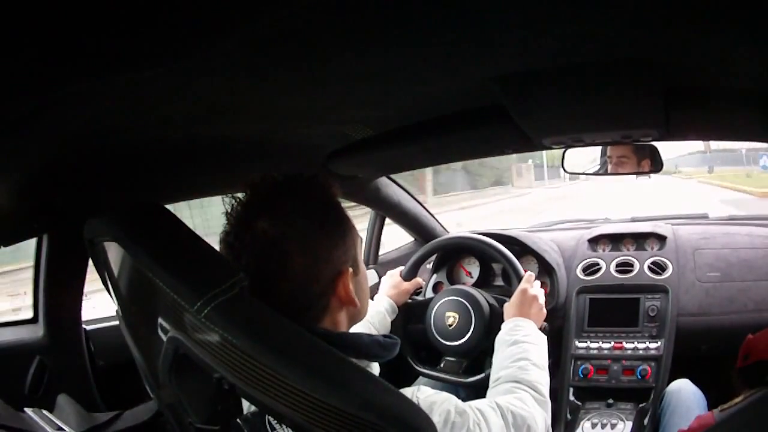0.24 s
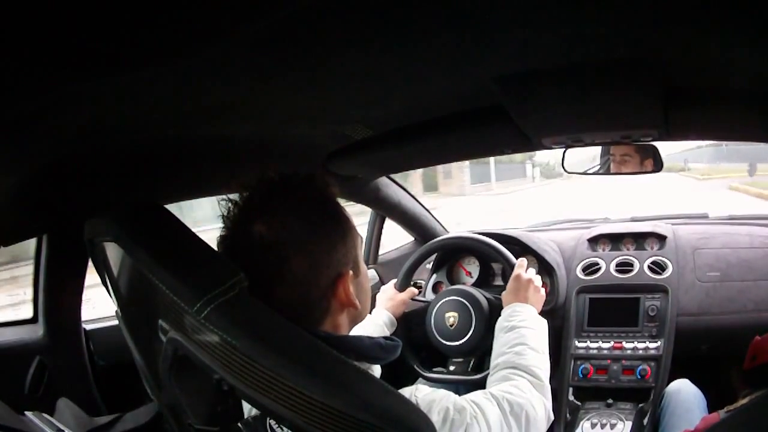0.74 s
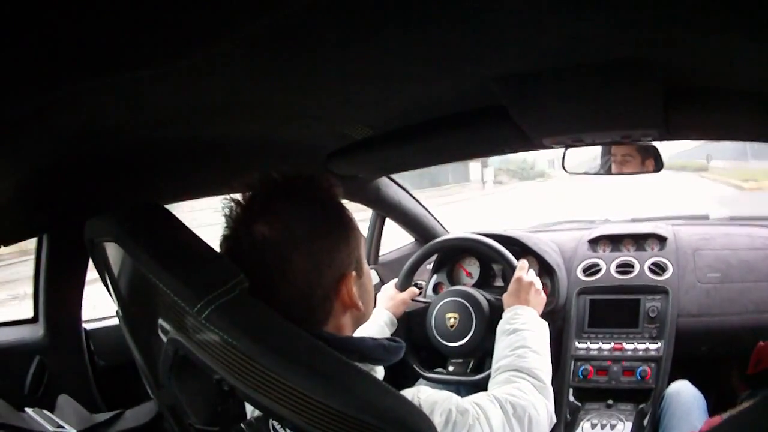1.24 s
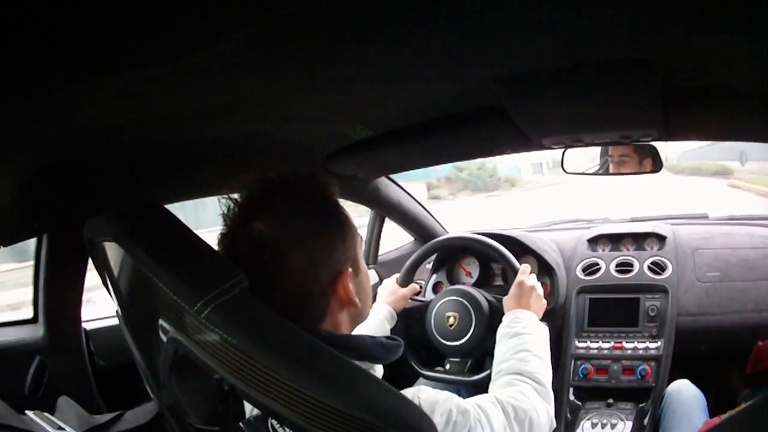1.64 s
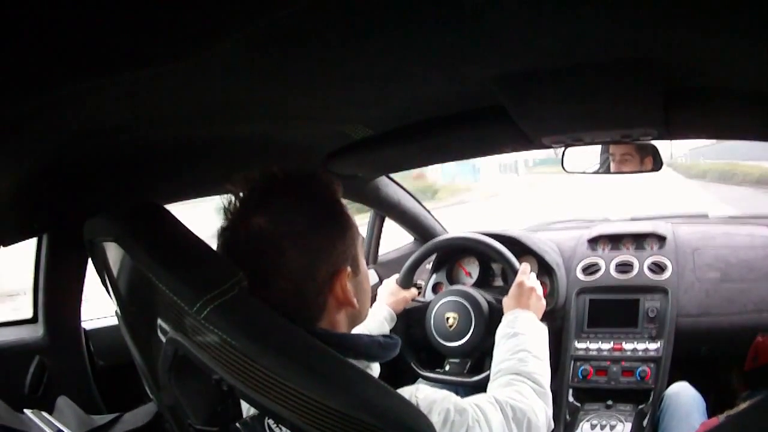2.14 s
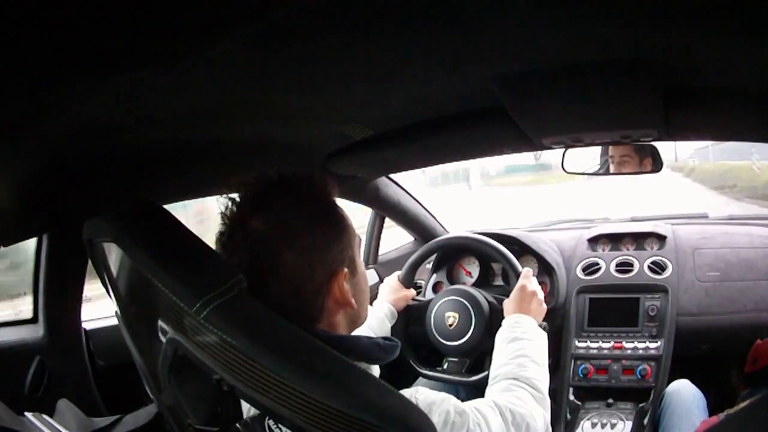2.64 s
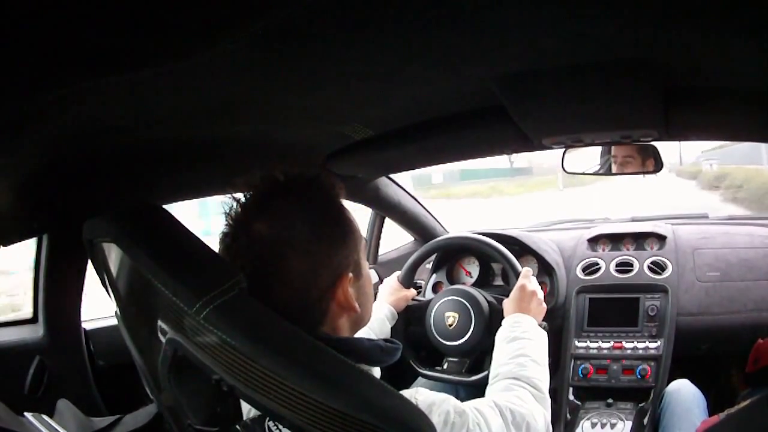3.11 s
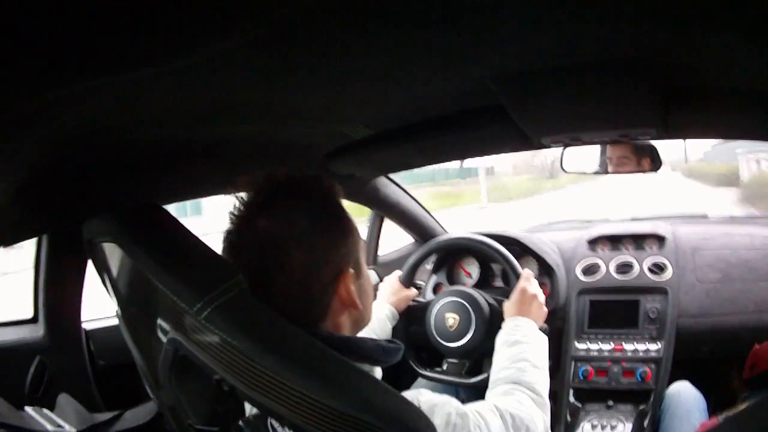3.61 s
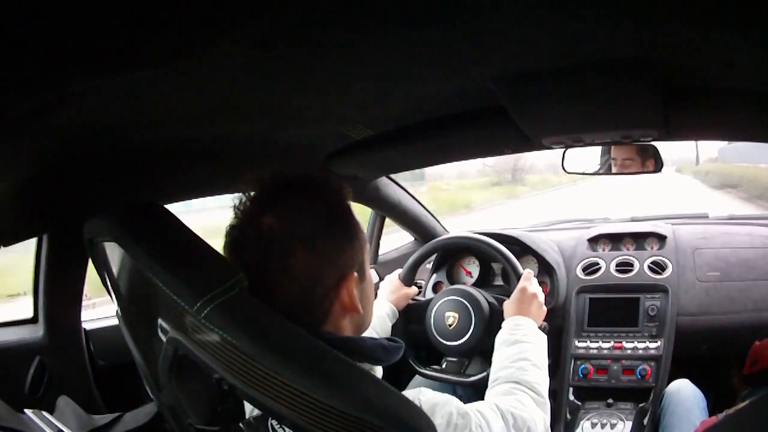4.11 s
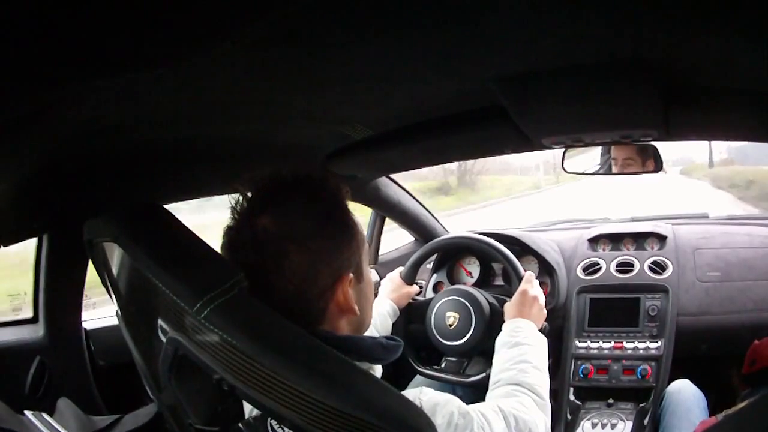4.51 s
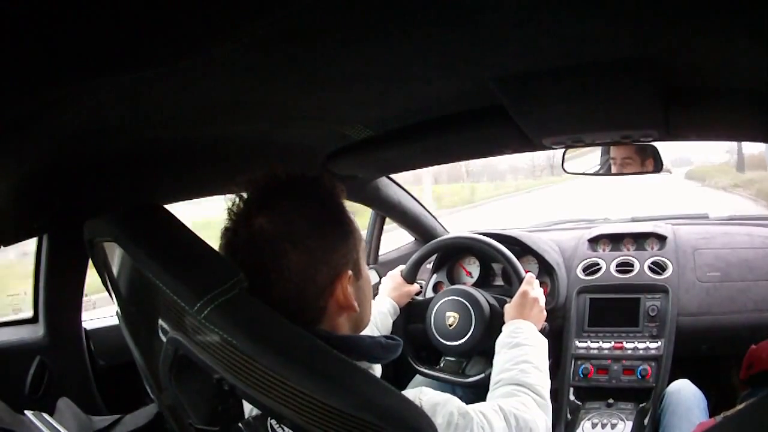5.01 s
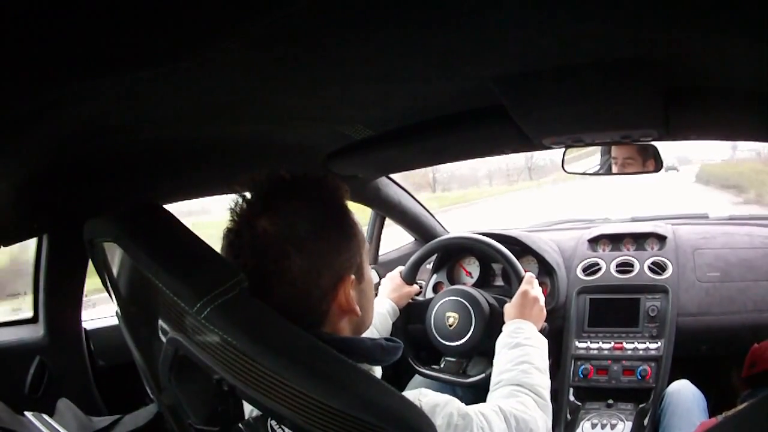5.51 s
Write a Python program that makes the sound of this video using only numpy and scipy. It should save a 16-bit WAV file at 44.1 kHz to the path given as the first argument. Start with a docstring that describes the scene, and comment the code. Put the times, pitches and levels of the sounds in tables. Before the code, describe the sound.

Inside a sports car, a steady ten-cylinder engine drone swells with the throttle over tyre roar, while rough road brings heavy low thuds and faint rattles.

```python
"""An engine drone is heard first, swelling on the throttle inside a ten-cylinder sports car on an open road.
Engine orders are sines locked to the crank; tyre roar, body boom and hiss are shaped noise.
Rough stretches bring noise shaking, deep decaying thuds, faint dry ticks and a few ringing trim knocks.
A thin steady whine lies underneath. One microphone behind the seats; distance is not modelled,
so each source is set directly at its level there."""
import sys
import numpy as np
from scipy import signal
from scipy.fft import rfft, irfft, next_fast_len
from scipy.io import wavfile
from scipy.ndimage import uniform_filter1d

SR = 44100
rng = np.random.default_rng(int(sys.argv[2]) if len(sys.argv) > 2 else 0)


def persist_wave(psi):
    """Save psi, clipped to +-1, as 16-bit WAV."""
    counts = np.round(np.clip(psi, -1, 1) * 32767).astype(np.int16)
    wavfile.write(sys.argv[1], SR, np.atleast_2d(counts).T)


N = 253575
TIME = np.arange(N) / SR  # s

# Engine speed, ten firings per four-stroke cycle: t/s, cycle rate f/Hz
ENGINE_SPEED = [(0, 26.92), (.3, 26.91), (.7, 26.69), (2.1, 26.31), (2.9, 26.75), (3.5, 27.2), (4.3, 26.96),
                (5.3, 26.85), (5.75, 26.66)]
# Engine orders in the cabin: multiple of the cycle rate, base coasting level/dB, full-throttle level/dB
ENGINE_ORDERS = [(5, -45, -37), (7, -54, -47), (8, -50, -39), (9, -54, -46), (10, -44, -31), (11, -49, -37),
                 (12, -48, -40), (13, -49, -43), (14, -50, -39), (16, -56, -49), (17, -64, -54),
                 (20, -60, -56), (21, -55, -56), (22, -58, -57), (23, -60, -57), (24, -54, -48),
                 (25, -53, -51), (26, -62, -59), (28, -65, -56), (30, -67, -60), (31, -72, -63),
                 (44, -78, -76), (50, -70, -72), (64, -77, -75)]
# Presses of the accelerator: start t/s, length t/s, depth (0-1)
PRESSES = [(-.5, 0.66, 1), (1.807, 1.05, 0.3), (2.713, .85, 1.0)]
PRESS_S, LIFT_S = 0.39, 0.081  # straight rise, decay time constant
# Exhaust resonance that the drone of order 15 passes through: centre and half width
PIPE_HZ, PIPE_WIDTH_HZ = 398, 7

# Spectrum of the tyre roar: f/Hz, relative level/dB per Hz
ROAR_SPECTRUM = [(60, -1), (115, 3.5), (160, -0.5), (240, 0), (340, 3), (430, -4.5), (500, -13), (570, -9),
                 (760, -8.5), (880, -17), (1080, -25), (1400, -28), (1820, -31.5), (2100, -44),
                 (3000, -51.5)]
# Narrow body resonances stirred by the tyres: f/Hz, width f/Hz, level/dB
PANELS = [(420.6, 42, -49), (666, 85, -56.5), (1725, 17, -73)]
# Rough stretches, from jolts to coarse asphalt:
# start t/s, length t/s, body shaking level/dB, slow cabin air heave level/dB, cabin boom level/dB
PATCHES = [(-.06, 0.085, -13, -11, -15), (1.281, 0.26, -12.5, -9.5, -24.5), (1.777, 0.18, -31, -7, -39.5),
           (1.968, .18, -15, -13, -25), (2.18, 0.26, -12.5, -10, -29), (3.586, .24, -10, -12, -24),
           (4.477, 0.087, -38, -37, -21.5), (4.689, 0.286, -21, -22, -20.5), (4.977, 0.26, -21, -18, -27),
           (5.3, 0.14, -23, -7.5, -53)]
SHAKE, HEAVE, BOOM = 2, 3, 4  # columns of PATCHES
PATCH_ATTACK_S, PATCH_RELEASE_S = 0.05, 0.07
# The same three levels on smooth road
SMOOTH_SHAKE_DB, SMOOTH_HEAVE_DB, SMOOTH_BOOM_DB = -24.5, -20, -32.5

# Spectrum of the body's shaking: f/Hz, relative level/dB per Hz
THUD_SPECTRUM = [(10, 0), (25, 10), (45, -2), (74, 0), (95, -16), (120, -20.5), (165, -18), (250, -26.5),
                 (500, -31), (1000, -53), (2000, -92)]
# Spectrum of the slow heave of the cabin air: f/Hz, relative level/dB per Hz
HEAVE_SPECTRUM = [(1, -31), (2, -18.5), (6, 10.5), (9, 1.5), (14, -26.5), (25, -6.5), (60, -46),
                  (200, -110)]
# Spectrum of the rustling interior: f/Hz, relative level/dB per Hz
RUSTLE_SPECTRUM = [(300, 1), (1000, 5), (1500, -2.5), (2200, -10.5), (4000, -15), (6000, -18.5),
                   (15000, -31)]

# Steady electronic whine: f/Hz, level/dB
WHINE = [(3898, -88), (6475, -81), (6525, -74), (9100, -77), (9150, -83), (11725, -90)]
# Spectrum of the electronic hiss: f/Hz, relative level/dB per Hz
HISS_SPECTRUM = [(100, -27), (2000, 2), (2700, 3.5), (3150, 4.5), (3600, 3), (5000, 2), (8000, 3),
                 (15000, 4.5)]

# Wheels striking edges in the road: t/s, level/dB, pitch of the body's answer f/Hz
THUMPS = [(0.022, -3, 62.4), (1.296, -8, 83.5), (1.356, -7, 62.3), (1.393, 0, 54.7), (1.436, -4, 68.8),
          (2.084, -8.5, 64.7), (2.207, -1.5, 56.4), (2.252, -2.5, 68.8), (3.633, 0, 67.4),
          (3.694, -1, 80.8), (3.762, -0.5, 52.3)]
# Clearest dry ticks: t/s, relative level/dB, ticks in the run
TICKS = [(1.3665, -33, 1), (1.4015, -38, 1), (1.460, -39, 1), (1.477, -34, 1), (1.5035, -39, 1),
         (1.513, -35, 2), (1.586, -38, 1), (1.906, -38, 1), (1.9865, -39, 1), (2.218, -39, 1),
         (2.377, -33, 2), (2.443, -35, 3), (3.688, -36, 2), (3.7425, -36, 1), (3.8325, -39, 1),
         (3.850, -38, 1), (5.370, -38, 1), (5.4405, -34, 1)]
# Within a run each tick follows quickly and is weaker than the last
TICK_GAP_S, TICK_FALL_DB = 0.0055, 1.5

# Small knocks of the trim: t/s, relative level/dB
KNOCKS = [(1.3818, -31), (1.384, -26), (2.0583, -27), (3.719, -39)]
# Modes of the ringing trim: f/Hz, relative level/dB, 60 dB decay t/s
TRIM_MODES = [(373, 6, 0.025), (550, -20, 0.035), (900, 2, 0.004), (1410, -0.5, 0.0087), (1764, -9, 0.024),
              (2500, -21, 0.0071), (3100, -5.5, 0.0081), (5630, -8.5, 0.0031)]
EDGE_HZ = 15300  # upper band edge


def gain_of(db):
    """Decibels to amplitude."""
    return 10 ** (np.asarray(db) / 20)


def evened(x):
    """Scales to rms 1."""
    return x / np.sqrt(np.mean(x ** 2) + 1e-20)


def curve(rows):
    """A time table interpolated at every sample."""
    return np.interp(TIME, *np.transpose(rows))


def add(mix, s, sound):
    """Mixes a sound in at time s, cut at the end of the mix."""
    part = mix[round(s * SR):][:len(sound)]
    part += sound[:len(part)]


def noise(shape):
    """Noise of rms 1 whose amplitude spectrum is shape(Hz)."""
    size = next_fast_len(N)
    hz = np.fft.rfftfreq(size, 1 / SR)
    spectrum = rfft(rng.standard_normal(size)) * shape(hz)
    return evened(irfft(spectrum, size)[:N])


def coloured(points):
    """Noise of rms 1 following a table of f/Hz and relative level/dB."""
    hz, db = np.transpose(points)
    return noise(lambda f: gain_of(np.interp(np.log(f + 1), np.log(hz + 1), db)))


def ringing(hz, width):
    """Noise of rms 1 in one steep-sided resonance."""
    return noise(lambda f: 1 / (1 + 0.5 * ((f - hz) / width) ** 2) ** 2)


def steadied(x, seconds):
    """Evens out the slow swells of a noise, so that its level can be steered."""
    size = max(int(seconds * SR), 2)
    power = uniform_filter1d(uniform_filter1d(x ** 2, size), size)
    return x / np.sqrt(abs(power) + 1e-9)


def drift(rate_hz):
    """Slow smooth random wander of rms 1."""
    steps = np.linspace(0, TIME[-1], 2048)
    hz = np.fft.rfftfreq(len(steps), steps[1])
    slow = irfft(rfft(rng.standard_normal(len(steps))) / (1 + (hz / rate_hz) ** 2))
    return np.interp(TIME, steps, evened(slow))


def swell(start, length, attack_s, release_s):
    """Rises in a straight line, holds until its length is over, then dies away."""
    held = np.clip((np.minimum(TIME, start + length) - start) / attack_s, 0, 1)
    return held * np.exp(-np.maximum(TIME - start - length, 0) / release_s)


def pedal():
    """Throttle opening, 0-1: pressed slowly, lifted quickly."""
    presses = [depth * swell(s, length, PRESS_S, LIFT_S) for s, length, depth in PRESSES]
    return np.max(presses, axis=0)


def road(smooth_db, column):
    """Strength of one vibration along the road: smooth surface and rough patches add in power."""
    power = gain_of(smooth_db) ** 2
    for row in PATCHES:
        patch = gain_of(row[column]) * swell(row[0], row[1], PATCH_ATTACK_S, PATCH_RELEASE_S)
        power = power + patch ** 2
    return np.sqrt(power)


def shaking():
    """How hard the road shakes the body."""
    return road(SMOOTH_SHAKE_DB, SHAKE)


def engine(waver_db=1.5, coasting_db=-0.16, drone_db=-43, drone_pull_db=9.0):
    """Firing gives order 10, each bank's beat 5 and 15; unequal cylinders fill in the orders between."""
    phase_wander = 0.001 * drift(rate_hz=4)  # cycles
    speed, throttle = curve(ENGINE_SPEED), pedal()
    turns = np.cumsum(speed) / SR + phase_wander  # four-stroke cycles
    # the square root lets order 15 drone in the exhaust even under light throttle
    in_tune = 1 / (1 + ((15 * speed - PIPE_HZ) / PIPE_WIDTH_HZ) ** 2)
    drone_level_db = drone_db + drone_pull_db * np.sqrt(throttle) * in_tune
    out = gain_of(drone_level_db) * np.sin(2 * np.pi * 15 * turns)
    for order, coast_db, pull_db in ENGINE_ORDERS:
        level_db = (1 - throttle) * (coast_db + coasting_db) + throttle * pull_db
        level_db = level_db + waver_db * drift(rate_hz=1.9)
        out += gain_of(level_db) * np.sin(2 * np.pi * (order * turns + rng.random()))
    return np.sqrt(2) * out  # the levels are rms


def tyres(roar_db=-34.0, pull_db=0.9, cavity_db=-13):
    """Tyre roar rises a little with throttle; coarse road stirs the cabin boom and hollow tyre note."""
    roar = gain_of(roar_db + pull_db * pedal()) * coloured(ROAR_SPECTRUM)
    panels = sum(gain_of(db) * ringing(hz, width) for hz, width, db in PANELS)
    boom = steadied(ringing(hz=91.2, width=11.0), seconds=0.19)
    cavity = steadied(ringing(hz=199, width=6), seconds=0.2)
    return roar + panels + road(SMOOTH_BOOM_DB, BOOM) * (boom + gain_of(cavity_db) * cavity)


def jolts(rustle_db=-34.5, looseness=2.13, grain_db=2):
    """The road shakes body and cabin air; the interior's rustle grows steeply with the swings."""
    shake = shaking()
    thud = shake * steadied(coloured(THUD_SPECTRUM), seconds=0.055)
    heave = road(SMOOTH_HEAVE_DB, HEAVE) * steadied(coloured(HEAVE_SPECTRUM), seconds=0.022)
    grain = gain_of(grain_db * drift(rate_hz=10))
    rub = np.hypot(thud, shake) ** looseness * grain
    return thud + heave + gain_of(rustle_db) * rub * coloured(RUSTLE_SPECTRUM)


def electronics(hiss_db=-64):
    """Even noise hiss and a few thin steady sine tones."""
    whine = sum(gain_of(db) * np.sin(2 * np.pi * (hz * TIME + rng.random())) for hz, db in WHINE)
    return np.sqrt(2) * whine + gain_of(hiss_db) * coloured(HISS_SPECTRUM)


def thumps(attack_s=0.0018, decay_s=0.022, overtone_db=-13):
    """Each blow through the suspension sets the body swinging for a few cycles."""
    out, t = np.zeros(N), TIME[:SR // 5]
    swing = (1 - np.exp(-t / attack_s)) * np.exp(-t / decay_s)
    for s, db, hz in THUMPS:
        overtone = gain_of(overtone_db) * np.sin(2 * np.pi * 2.196 * hz * t)
        body = np.sin(2 * np.pi * hz * t) + overtone
        add(out, s, gain_of(db) * swing * body)
    return out


def ticks(tick_db=6, decay_s=0.00027, faint_db=-42, faint_per_s=40):
    """Faint dry ticks, sudden steps dying away at once: singly, in runs or scattered in the hardest shaking."""
    shake = shaking()
    chance = faint_per_s / SR * (shake / shake.max()) ** 4  # per sample
    steps = (rng.random(N) < chance) * gain_of(faint_db) * rng.uniform(-1, 1, N)
    for s, db, count in TICKS:
        for k in range(count):
            add(steps, s + k * TICK_GAP_S, gain_of([db - k * TICK_FALL_DB]))
    fade = np.exp(-TIME[:SR // 100] / decay_s)
    return gain_of(tick_db) * signal.oaconvolve(steps, fade)[:N]


def knocks(push_db=15, push_s=0.0018, shudder_db=-0.5, shudder_s=0.023):
    """Loose trim strikes its seat: a push of air, a brief ring and a dull shudder of the panels around it."""
    out, t = np.zeros(N), TIME[:SR // 5]
    ring = sum(gain_of(db - 60 * t / t60) * np.sin(2 * np.pi * hz * t) for hz, db, t60 in TRIM_MODES)
    push = gain_of(push_db) * np.exp(-t / push_s)
    contact = 1 - np.exp(-(t / 0.0004) ** 2)  # softens the onset
    shudder = np.zeros(N)
    for s, db in KNOCKS:
        add(out, s, gain_of(db) * contact * (ring + push))
        add(shudder, s, gain_of(db + shudder_db) * contact * np.exp(-t / shudder_s))
    return out + shudder * coloured(ROAR_SPECTRUM)


def scene():
    """Everything heard at one microphone behind the seats."""
    mix = engine() + tyres() + jolts() + electronics() + thumps() + ticks() + knocks()
    return mix[None]


def record(dry):
    """Rounds off the biggest thuds at full scale, then limits the band."""
    rounded = dry / (1 + dry ** 6) ** (1 / 6)
    lowpass = signal.firwin(301, EDGE_HZ, window=("kaiser", 8), fs=SR)
    return signal.oaconvolve(rounded, lowpass[None], "same")


dry = scene()
out = record(dry)
persist_wave(out)
```